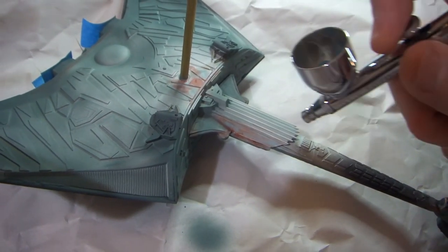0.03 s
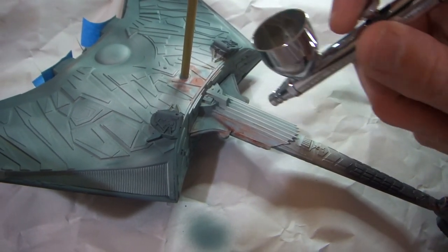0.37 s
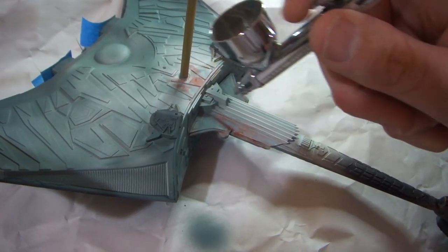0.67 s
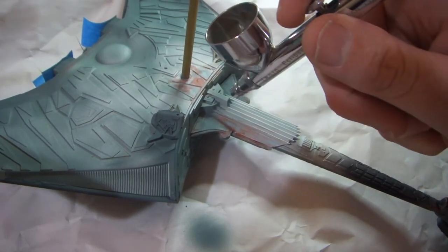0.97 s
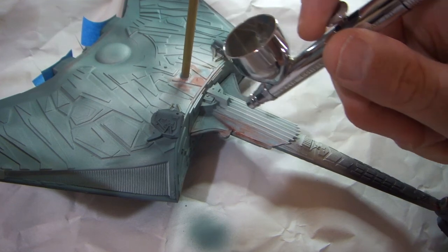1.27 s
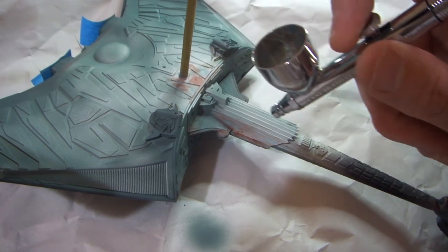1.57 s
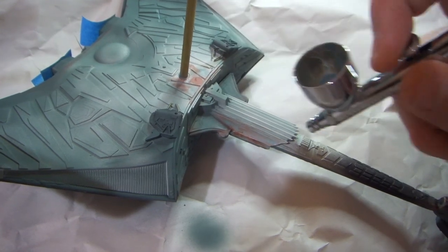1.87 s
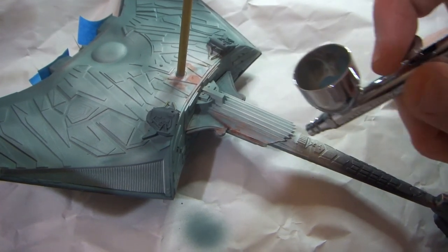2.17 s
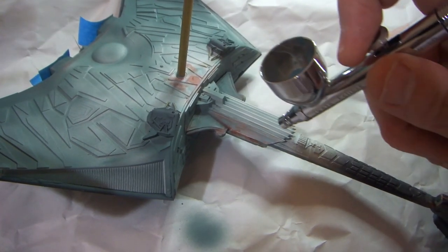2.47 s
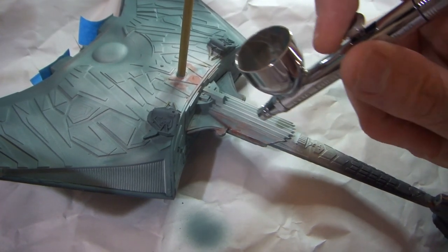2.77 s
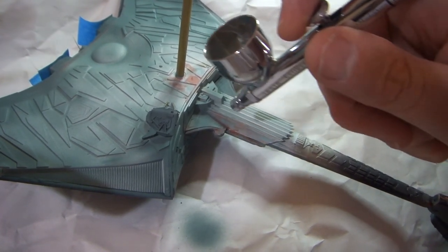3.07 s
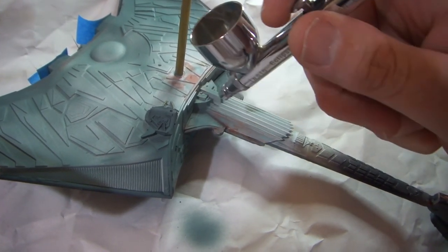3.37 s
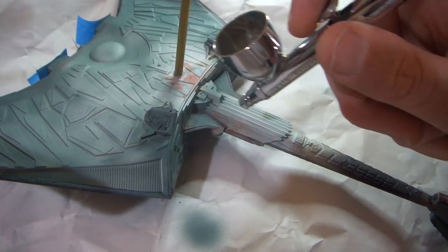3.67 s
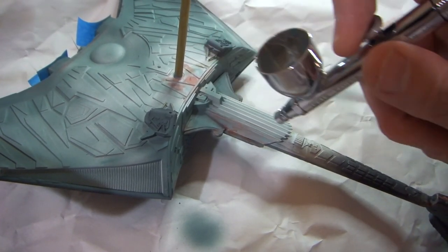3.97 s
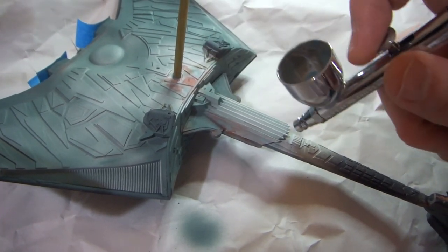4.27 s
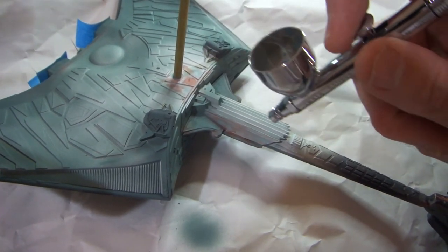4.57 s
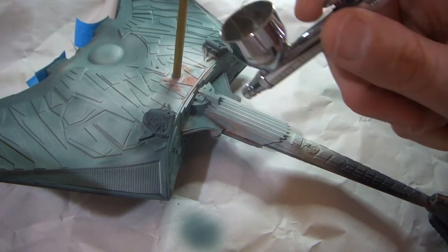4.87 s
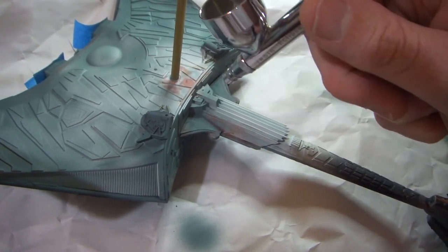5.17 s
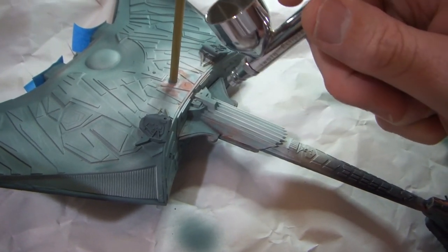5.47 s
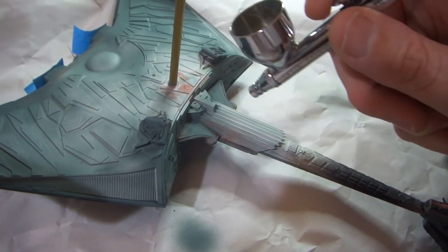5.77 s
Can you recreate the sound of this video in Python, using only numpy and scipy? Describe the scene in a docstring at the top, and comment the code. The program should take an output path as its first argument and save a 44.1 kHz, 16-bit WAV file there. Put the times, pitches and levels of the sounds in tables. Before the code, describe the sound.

A close airbrush is already hissing at the start, its air rushing and faintly ringing across the hollows of a plastic model. Five times the spray stops sharply with a tiny valve knock, leaving a brief gap of faint room noise and hum. Each time it comes back with a short, stronger spurt and settles into an even hiss. The room is small and nearly dry.

```python
"""An airbrush sprays a plastic model in six passes, heard close by in a small, faintly humming workshop.
The first pass is already under way: the nozzle hisses, and the turbulent jet rushes on the surface and
rings the hollows that it sweeps across. A release cuts it dead, leaving a dull knock and a short room
tail. Each new press starts with a surge of stored air; the sixth pass is still spraying at the end."""
import sys
import numpy as np
from scipy import signal
from scipy.fft import rfft, irfft
from scipy.io import wavfile

SR = 44100
rng = np.random.default_rng(int(sys.argv[2]) if len(sys.argv) > 2 else 0)


def dump(signal):
    """Clip the signal to [-1, 1] and save it as 16-bit WAV at the path in sys.argv[1]."""
    limited = np.clip(np.atleast_2d(signal).T, -1, 1)
    pcm = np.round(limited * 32767).astype(np.int16)
    wavfile.write(sys.argv[1], SR, pcm)


N = 261954
TIME = np.arange(N) / SR
FREQS = np.maximum(np.arange(N // 2 + 1) * SR / N, 1)

# one trigger press per pass: leak_start_s, fully_open_s, close_start_s, shut_s
PRESSES = [(-.25, -.22, .716, .725), (.862, .871, 1.960, 1.982), (2.148, 2.175, 3.149, 3.158),
           (3.347, 3.358, 4.288, 4.306), (4.490, 4.511, 5.176, 5.185), (5.374, 5.393, 6.1, 6.2)]


def undb(db):
    """Amplitude ratio of a level in decibels."""
    return 10 ** (np.asarray(db) / 20)


def colour(points):
    """Spectral envelope: gain through (frequency_hz, level_db) points on a log frequency axis."""
    hz, db = np.transpose(points)
    return undb(np.interp(np.log(FREQS), np.log(hz), db))


def resonance(hz, width_hz):
    """Gain of two like resonators in cascade, with a joint half-power bandwidth of width_hz."""
    detune = (FREQS / hz - hz / FREQS) * hz / width_hz
    return 1 / (1 + (np.sqrt(2) - 1) * detune ** 2)


def noise(gain):
    """Filtered Gaussian noise of rms 1, the model for turbulence."""
    x = irfft(rfft(rng.standard_normal(N)) * gain, N)
    return x / np.std(x)


def flutter(rate_hz, rms_db):
    """Random amplitude modulation: a gain that wavers at up to about rate_hz."""
    return undb(rms_db * noise(1 / (1 + (FREQS / rate_hz) ** 4)))


def coverage(aim_cm, place_cm, reach_cm):
    """Gaussian jet profile: how fully the air covers a place on the model, 0-1."""
    return np.exp(-.5 * ((aim_cm - place_cm) / reach_cm) ** 2)


def workshop(noise_db=-56, hum_db=-70, hum_hz=120):
    """Ambient noise floor: broadband noise and mains hum under one slow amplitude modulation."""
    # background spectrum: frequency_hz, relative_density_db
    spectrum = [(22, -17.5), (43, -12), (65, -10), (105, -1), (170, 0), (280, 0.5), (450, -4), (800, -6),
                (1500, -9), (3000, -15), (5000, -16.5), (9300, -21), (11000, -50.5), (14000, -32.5)]
    # swell of the background: time_s, gain_db
    swell = [(0, -3.5), (.8, 1.5), (1.6, -7), (2.15, 1.5), (2.55, -6), (3.25, -0.5), (3.9, -3), (4.4, 2),
             (5.3, 2), (5.94, 4.5)]
    swell_db = np.interp(TIME, *np.transpose(swell))
    hum = np.sqrt(2) * np.sin(2 * np.pi * hum_hz * TIME)
    floor = undb(noise_db) * noise(colour(spectrum)) + undb(hum_db) * hum
    return floor * undb(swell_db) * flutter(rate_hz=7.1, rms_db=1.0)


def room(x, wet_db=-23.5, t60_s=0.23, gap_s=0.004, cutoff_hz=8000):
    """Reverberation: diffuse reflections decay exponentially and are duller than the direct sound."""
    decay = np.exp(-np.log(1000) * TIME / t60_s) * (TIME > gap_s)
    tail = noise(1 / np.hypot(1, FREQS / cutoff_hz)) * decay
    return undb(wet_db) * signal.fftconvolve(x, tail / np.linalg.norm(tail))[:N]


def plunger(level_db=-44, t60_s=0.057):
    """Damped impact: a dull little knock as the valve springs back on its seat."""
    ages = TIME - np.array(PRESSES)[:, 2:3]  # since each release began
    decay = np.sum(np.exp(-np.log(1000) * np.abs(ages) / t60_s) * (ages > 0), axis=0)
    return undb(level_db) * decay * noise(resonance(hz=330, width_hz=350))


def valve(crack_db=-39, leak_db=-9, snap_s=0.0043, shut_db=-42, spit_db=2.0, spit_s=0.0061):
    """Throttling of the airflow: a press lets it leak, then pops it open; a release shuts it at once."""
    flow = np.zeros(N)
    for leaks, opened, closes, shut in PRESSES:
        creep_db = np.interp(TIME, [leaks, opened], [crack_db, leak_db])
        pop_db = shut_db / 2 * np.maximum(opened - TIME, 0) / snap_s
        burst_db = spit_db * np.exp(-np.abs(TIME - opened) / spit_s)  # trapped air spits out first
        close_db = np.interp(TIME, [closes, shut], [0, shut_db])
        flow += undb(np.maximum(creep_db, pop_db) + burst_db + close_db) * (TIME > leaks) * (TIME < shut)
    return flow


def surface_rush(level_db):
    """Jet impingement: air breaking on the model makes midrange noise."""
    # spectrum of the rush: frequency_hz, relative_density_db
    spectrum = [(25, -49), (70, -50.5), (150, -30), (300, -15.5), (470, -12.5), (700, -4), (950, 0),
                (1280, 0.5), (1550, -2.5), (2200, 4), (2600, -3), (4000, -30.5)]
    return undb(level_db) * noise(colour(spectrum)) * flutter(rate_hz=36, rms_db=0.5)


def cavity_ring(aim_cm, gain_db):
    """Cavity resonance: turbulence drives the modes of five hollows, most strongly when aimed at them."""
    # air cavities between nozzle and model, each a list of modes: pitch_hz, width_hz, level_db
    cavities = [
        [(1870, 360, -6), (2250, 310, -0.5)],
        [(2760, 600, 0)],
        [(3567, 200, -6.5), (4063, 450, -2.5)],
        [(4400, 250, -1), (6560, 370, -7.5)],
        [(5540, 670, 0.5)],
    ]
    # each cavity's position and drive: place_cm, reach_cm, aimed_db, stray_air_db
    places = [(3.1, 2.2, -29, -35.5), (4.17, 0.51, -25, -35.5), (3.84, 2.4, -26.5, -44.5),
              (2.65, 0.49, -25.5, -35), (4.97, 1.74, -27, -35)]
    rings = np.zeros(N)
    for modes, (place_cm, reach_cm, aimed_db, stray_db) in zip(cavities, places):
        ring = sum(undb(db) * noise(resonance(hz, width_hz)) for hz, width_hz, db in modes)
        drive_db = stray_db + (aimed_db - stray_db) * coverage(aim_cm, place_cm, reach_cm)
        hand_tremor = flutter(rate_hz=13, rms_db=1.16)
        rings += undb(gain_db + drive_db) * ring * hand_tremor
    return rings


def nozzle_hiss(aim_cm, level_db):
    """Free-jet turbulence: a bright hiss, partly screened when close to the surface."""
    # spectrum of the free jet: frequency_hz, relative_density_db
    spectrum = [(100, -71), (1000, -20), (3000, -4.5), (5000, -12), (6400, -4.5), (7400, 0.7), (8150, 2),
                (9100, 1.5), (10100, -5), (10600, -14.5), (11700, -23.5), (12400, -25.5), (13100, -19.5),
                (14000, -15)]
    screening_db = -3 * coverage(aim_cm, place_cm=3.52, reach_cm=0.87)
    hiss = undb(level_db + screening_db) * noise(colour(spectrum))
    return hiss * flutter(rate_hz=110, rms_db=0.7)  # paint tears off the needle unevenly


def airbrush(surge_s=0.097, surge_steepness=3.3, waver_half_s=0.035):
    """Aerodynamic noise: one airflow feeds hiss, rush and ring, surging until the stored air is spent."""
    # strength of each pass: hiss_db, ring_db, hiss_surge_db, model_surge_db
    strengths = [(-21.2, -0.3, 0, 0), (-22, 0.7, 4, 3.5), (-23, 0.5, 4, 2.5), (-23, -0.23, 5, 2.5),
                 (-22, -0.7, 4, 4), (-21, -2.3, 3.5, 4.3)]
    # the hand's sweep to and fro along the model: time_s, aim_cm, rush_db
    sweep = [(0, 5, -34), (.08, 4.5, -33), (.2, 3.5, -33), (.51, 3, -31), (.76, 0.66, -30.5),
             (1.1, 1.2, -34), (1.45, 3, -32), (1.61, 3.5, -32.5), (1.73, 4, -38), (1.88, 7, -43),
             (1.97, 4.5, -33), (2.18, 5, -27.5), (2.38, 4.5, -36.5), (2.54, 4, -38), (2.79, 3, -27.5),
             (3.11, 2.5, -30), (3.47, 0.84, -37.5), (3.56, 2.5, -29.5), (3.92, 3, -28), (4.0, 4, -31.5),
             (4.2, 5, -30), (4.51, 4, -34), (4.59, 4, -30), (4.69, 3, -24), (4.831, 2.5, -31),
             (5.01, 1.05, -30.5), (5.52, -.3, -32), (5.78, 2, -30.5), (5.85, 4.5, -30)]
    # brief swells and sags of the spray: time_s, gain_db
    wavers = [(.94, 1), (1.02, 1), (1.7, 2), (1.8, 1), (2.33, 1.6), (2.49, 0.5), (2.93, -1.5), (3.05, 1),
              (3.73, -1.5), (3.82, 1.3), (4.01, 2), (4.18, -2.5), (4.59, 0.9), (4.99, 1.5)]
    leaks, opened = np.transpose(PRESSES)[:2]
    press = np.searchsorted(leaks, TIME) - 1
    hiss_db, ring_db, hiss_surge_db, model_surge_db = np.array(strengths)[press].T
    sweep_s, *columns = np.transpose(sweep)
    aim_cm, rush_db = (np.interp(TIME, sweep_s, column) for column in columns)
    open_for_s = np.maximum(TIME - opened[press], 0)
    stored_air = np.exp(-(open_for_s / surge_s) ** surge_steepness)
    waver_db = sum(db * np.exp(-((TIME - at) / waver_half_s) ** 2) for at, db in wavers)
    flow = undb(waver_db) * valve() * flutter(rate_hz=55, rms_db=0.22)
    hiss = nozzle_hiss(aim_cm, hiss_db + hiss_surge_db * stored_air)
    on_model = surface_rush(rush_db) + cavity_ring(aim_cm, ring_db)
    return flow * (hiss + undb(model_surge_db * stored_air) * on_model)


def dip_bass(x, corner_hz=770):
    """Time-varying shelf filter: the low end drops away briefly three times."""
    # dips of the bass: centre_s, half_length_s, gain_db
    dips = [(1.09, 0.016, -5), (1.785, 0.031, -30), (2.555, .02, -8)]
    bass = irfft(rfft(x) / (1 + (FREQS / corner_hz) ** 8), N)
    dip_db = sum(db * np.exp(-((TIME - at) / half_s) ** 2) for at, half_s, db in dips)
    return x + (undb(dip_db) - 1) * bass


def scene():
    """Superposition of spray, knocks, room tail and background, alike in both channels."""
    spray = airbrush()
    mono = dip_bass(spray + plunger() + room(spray) + workshop())
    return np.array([mono, mono])


def record(dry):
    """Band limiting: a steep elliptic low-pass cuts the treble above 14 kHz."""
    return signal.sosfilt(signal.ellip(12, .1, 80, 14000, fs=SR, output="sos"), dry)


dry = scene()
out = record(dry)
dump(out)
```